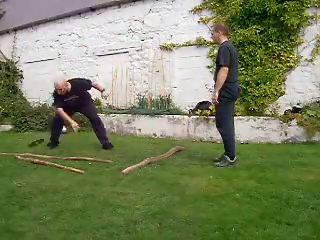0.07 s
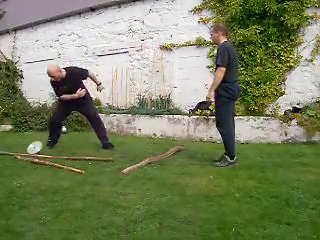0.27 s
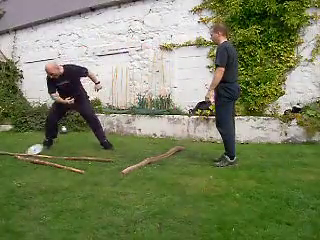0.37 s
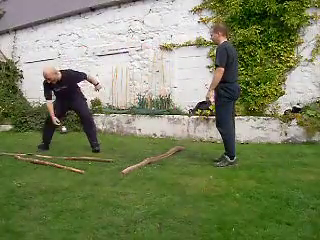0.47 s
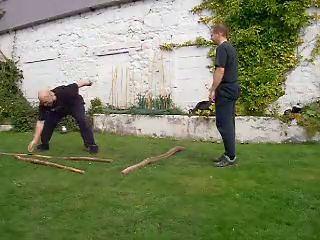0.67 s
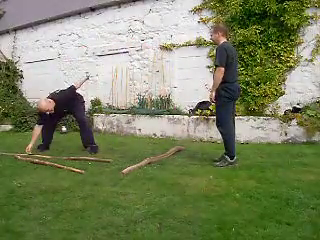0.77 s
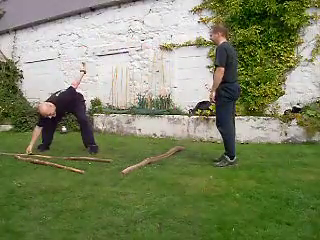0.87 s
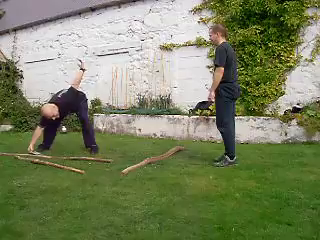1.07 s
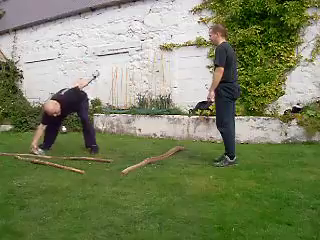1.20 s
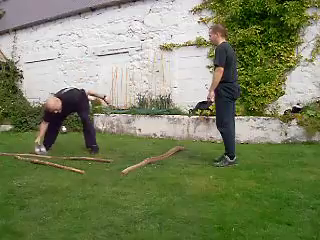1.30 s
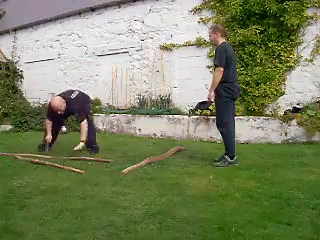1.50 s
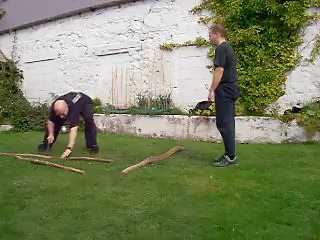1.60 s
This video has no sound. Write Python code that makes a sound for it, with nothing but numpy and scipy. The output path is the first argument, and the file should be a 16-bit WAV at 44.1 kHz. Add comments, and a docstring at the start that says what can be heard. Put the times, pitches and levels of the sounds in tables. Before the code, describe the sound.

A steel disc clacks against wood and rings brightly, then dies away in grass.

```python
"""On a lawn, one microphone into a small narrow-band recorder, which hisses and faintly whines.
At 0.2 s a thrown steel disc clacks against a wooden stick and flies on, ringing. The ring swells as
the disc turns, near enough for its loudest beats to overload the recorder, over a dull rumble.
At 0.53 s the disc lands and the ring changes colour. After a few soft knocks and thuds the grass
chokes it from 0.8 s, and one low mode lingers."""
import sys
import numpy as np
from scipy import signal
from scipy.fft import rfft, irfft
from scipy.io import wavfile

SR = 44100
rng = np.random.default_rng(int(sys.argv[2]) if len(sys.argv) > 2 else 0)


def int16_out(signal):
    """Quantize to a 16-bit WAV file."""
    q = np.round(np.clip(np.atleast_2d(signal).T, -1, 1) * 32767)
    wavfile.write(sys.argv[1], SR, q.astype(np.int16))


N = 72765
STRIKE_S, LANDING_S, SETTLE_S = 0.2015, 0.53, 0.8


def from_db(db):
    return 10 ** (np.asarray(db) / 20)


def rms_one(x):
    return x / np.sqrt(np.mean(x ** 2) + 1e-20)


def seconds():
    return np.arange(N) / SR


def drift(rate_hz):
    """A slow random wander with spread 1."""
    pole = np.exp(-80 * np.pi * rate_hz / SR)   # one step per 40 samples
    steps = rng.standard_normal(N // 40 + 2002)
    slow = signal.lfilter([1], [1, -2 * pole, pole * pole], steps)[2000:]
    return np.interp(np.arange(N) / 40, np.arange(len(slow)), rms_one(slow))


def noise(spectrum):
    """Noise of a given colour, rms 1."""
    hz, db = np.transpose(spectrum)
    bins_hz = np.maximum(np.arange(N // 2 + 1) * SR / N, 1)
    gains = from_db(np.interp(np.log(bins_hz), np.log(hz), db))
    return rms_one(irfft(rfft(rng.standard_normal(N)) * gains, N))


def resonate(x, hz, t60):
    """One damped mode: a unit click sets a sine of height 1 ringing."""
    radius, angle = from_db(-60 / (t60 * SR)), 2 * np.pi * hz / SR
    return signal.lfilter([0, np.sin(angle)], [1, -2 * radius * np.cos(angle), radius ** 2], x + 1e-18)


# Colour of the noise floor: f/Hz, relative density/dB
HISS_SPECTRUM = [(15, -17), (30, -4.5), (80, 1.5), (130, -3), (220, -5), (550, -6.5), (1200, -9),
                 (3000, -11.5), (3900, -11.5), (4400, -31), (5000, -63.5)]

def recorder_hiss(hiss_db=-50, whine_db=-61.5, whine_hz=3020):
    """The recorder's even hiss and its own faint tone."""
    whine = np.sqrt(2) * np.sin(2 * np.pi * whine_hz * seconds())
    return from_db(hiss_db) * noise(HISS_SPECTRUM) + from_db(whine_db) * whine


# Contacts of steel on wood: t/s, level/dB, f/Hz above which the knock is dull
WOOD_CONTACTS = [(0.2012, -12, 3800), (.203, -11, 3020), (0.2062, -13.5, 2400), (.2185, -28, 3600),
                 (.295, -14.5, 1770), (.385, -16, 2005), (.535, -25, 2400), (.552, -18.5, 2400),
                 (.588, -25.5, 2000), (.632, -34.5, 2176), (.665, -33, 1700), (.722, -24, 1700),
                 (.77, -32, 1600), (.812, -44, 1640)]
# Resonances of the clack: f/Hz, relative level/dB, t60/s
CLACK_MODES = [(470.4, -8, 0.11), (657, -9, 0.073), (862, -12, .05), (1276, 4.5, 0.04), (1463, 5.5, 0.017),
               (1757.5, 4, 0.047), (1990, -3, 0.1), (2340, -1.5, 0.061), (2624, -12, .07),
               (2736, -5, 0.036), (3220, -16.5, 0.036), (3520, 5, .07), (3597, -3, 0.14)]

def wood_knocks(contact_s=0.0014, crack_db=-8, crack_t60_s=0.15, low_cut_hz=450):
    """Each contact is a short rough push into the clack's resonances, with a crack of noise."""
    t, out = seconds(), np.zeros(N)
    for start_s, db, dull_hz in WOOD_CONTACTS:
        age = np.maximum(t - start_s, 0)
        push = (t >= start_s) * np.exp(-age / contact_s)
        body = np.zeros(N)
        for hz, mode_db, t60 in CLACK_MODES:
            drive = push * np.cos(2 * np.pi * (hz * age + rng.random())) * 2 / push.sum()
            body += from_db(mode_db) * resonate(drive, hz, t60)
        crack = (t >= start_s) * from_db(crack_db - 60 * age / crack_t60_s) * rng.standard_normal(N)
        band = signal.butter(2, [low_cut_hz, dull_hz], "band", fs=SR, output="sos")
        out += from_db(db) * signal.sosfilt(band, 0.5 * body + crack)
    return out


def strike_to_choke(choke_db_per_s=83.5):
    """The ring's envelope: it opens at the strike and dies once the disc settles in the grass."""
    t = seconds()
    attack = np.clip((t - STRIKE_S) / 0.002, 0, 1)
    return attack * from_db(-choke_db_per_s * np.maximum(t - SETTLE_S, 0))


# Swells and dips of single modes: f/Hz, centre t/s, half-length/s, gain/dB
MODE_SWELLS = [(1114, 0.292, 0.046, 13), (1114, 0.715, 0.057, 14.5), (1638, 0.41, 0.11, 6.5),
               (1950, .595, 0.027, 9), (2347, 0.381, 0.024, 10), (2347, .46, 0.033, -12),
               (2347, 0.537, 0.05, 8), (2564, 0.502, 0.089, 7.5), (2645, .645, .03, 8),
               (3095, .69, 0.052, 11), (3219, .3, .012, 4), (3219, 0.479, 0.01, 5), (3946, .65, 0.086, 3.5),
               (4054, .65, 0.092, 6)]

def turning_db(mode_hz, reach_hz=8):
    """One mode swells or fades at the microphone as the disc turns."""
    t = seconds()
    return sum(db * np.exp(-((t - centre_s) / half_s) ** 2)
               for hz, centre_s, half_s, db in MODE_SWELLS if abs(hz - mode_hz) < reach_hz)


# Modes of the steel disc: f/Hz
DISC_MODES_HZ = [213, 352, 544, 592, 845, 942, 1089, 1114, 1340, 1497, 1638, 1950, 1982, 2144, 2186, 2347,
                 2564, 2722, 2745, 3050, 3074, 3095, 3219, 3257, 3284, 3330, 3402, 3419, 3440, 3946, 4054]
# Strength of each mode in flight: base level/dB
FLIGHT_LEVELS_DB = [-52, -52.5, -34.5, -44, -44.5, -55.5, -39.5, -39.5, -71, -52, -36.5, -40.5, -34, -39.5,
                    -51, -28.5, -26.5, -44.5, -34, -36.5, -29, -31, -15, -20.5, -24, -31, -40.5, -17.5, -20,
                    -48, -47]
# Strength of each mode on the lawn: base level/dB
LAWN_LEVELS_DB = [-66.5, -54.5, -46, -52, -52, -52.5, -44, -43.5, -49.5, -46, -42, -41, -53, -42, -44.5,
                  -40, -40.5, -40.5, -44.5, -41.5, -37, -36, -31, -32, -29, -31.5, -31.5, -36.5, -37.5, -51,
                  -55.5]

def disc_ring(bright_above_hz=2450, tumble_hz=19.2, drift_hz=9.34, waver_hz=1.335, wobble_db=3.25):
    """Close modes of the steel beat against each other; landing gives them new strengths."""
    t = seconds()
    since_landing = t - LANDING_S
    landed = np.clip(since_landing / 0.03 + 0.5, 0, 1)   # 30 ms crossfade
    swell_db = np.interp(t, [0.234, 0.34], [-12, 6]) - 55 * np.maximum(t - 0.34, 0)
    tumble_db = np.cos(2 * np.pi * tumble_hz * (t - 0.39))   # faces the microphone at 0.39 s
    out = np.zeros(N)
    for hz, flight_db, lawn_db in zip(DISC_MODES_HZ, FLIGHT_LEVELS_DB, LAWN_LEVELS_DB):
        if hz > bright_above_hz:
            in_flight = from_db(flight_db + swell_db + tumble_db)
            on_lawn = from_db(lawn_db + 7 - 47.5 * since_landing)
        else:   # the lower modes fade more slowly
            in_flight = from_db(flight_db + 2 - 6.5 * (t - STRIKE_S))
            on_lawn = from_db(lawn_db + 4 - 27 * since_landing)
        cycles = np.cumsum(hz + waver_hz * drift(drift_hz)) / SR + rng.random()
        level = (1 - landed) * in_flight + landed * on_lawn
        level *= from_db(turning_db(hz) + wobble_db * drift(drift_hz))
        out += level * np.sqrt(2) * np.sin(2 * np.pi * cycles)
    return out * strike_to_choke()


# Colour of the weak modes between the strong ones: f/Hz, relative level/dB
WASH_SPECTRUM = [(150, -21.5), (400, -15), (700, -5), (1300, -4.5), (2000, 1), (2800, 1), (3300, -0.5),
                 (3700, -3), (4000, -19), (4700, -16)]

def weak_mode_wash(count=140, start_db=-21, fall_db_per_s=36):
    """A thicket of weak modes that beat against each other and die away with the ring."""
    t = seconds()
    hz, db = np.transpose(WASH_SPECTRUM)
    pitches_hz = np.linspace(150, 4600, count) + rng.uniform(-15, 15, count)
    gains = from_db(np.interp(np.log(pitches_hz), np.log(hz), db))
    thicket = sum(gain * np.sin(2 * np.pi * (pitch * t + rng.random()))
                  for pitch, gain in zip(pitches_hz, gains))
    level_db = start_db - fall_db_per_s * (t - STRIKE_S) + 1.8 * drift(rate_hz=15)
    return rms_one(thicket) * strike_to_choke() * from_db(level_db)


# Bursts of low noise: t/s, level/dB, t60/s
LOW_BURSTS = [(.203, -39, 0.26), (.29, -40, .35), (.375, -41, 0.23), (.575, -40, 0.34), (.7, -48.5, 0.66)]
# Colour of the bursts: f/Hz, relative density/dB
LOW_SPECTRUM = [(30, -12), (60, -10.5), (80, 4), (110, -15), (140, -4.5), (250, -16.5), (600, -32)]

def rumble_and_thuds(rise_s=0.023):
    """Low dull rumble while the loud ring overloads the recorder, then soft thuds after the landing."""
    t, level = seconds(), np.zeros(N)
    for start_s, db, t60 in LOW_BURSTS:
        age = np.maximum(t - start_s, 0)
        level += np.minimum(age / rise_s, 1) * from_db(db - 60 * age / t60)
    return level * noise(LOW_SPECTRUM)


def lingering_mode(hz=545, start_db=-49.5, fall_db_per_s=40, rise_s=0.033):
    """The grass damps one low mode less than the rest, so it outlasts the choke."""
    age = seconds() - SETTLE_S
    level = np.clip(age / rise_s, 0, 1) * from_db(start_db - fall_db_per_s * age)
    return level * np.sqrt(2) * np.sin(2 * np.pi * hz * age)


def scene():
    """The throw as one microphone on the lawn hears it, over the recorder's noise floor."""
    ring = disc_ring() + lingering_mode()
    return (ring + wood_knocks() + rumble_and_thuds() + weak_mode_wash() + recorder_hiss())[None]


def record(dry, stopband_hz=4900, top_cut_hz=15900):
    """The input overloads, the band is narrowed, the remaining peaks are clipped and the top is cut."""
    narrow_band = signal.cheby2(16, 70, stopband_hz, fs=SR, output="sos")
    top_cut = signal.ellip(10, 0.2, 80, top_cut_hz, fs=SR, output="sos")
    overloaded = np.clip(dry, -0.9, 0.82)
    narrowed = signal.sosfilt(narrow_band, overloaded)
    clipped = np.clip(narrowed, -0.72, 0.72)
    return signal.sosfilt(top_cut, clipped)


dry = scene()
out = record(dry)
int16_out(out)
```